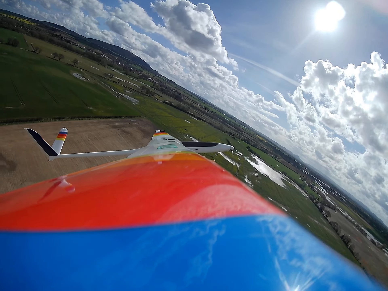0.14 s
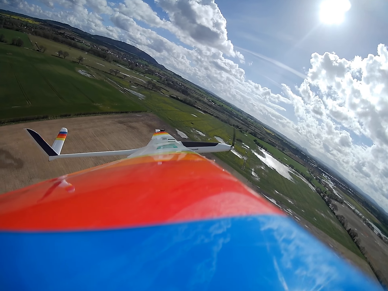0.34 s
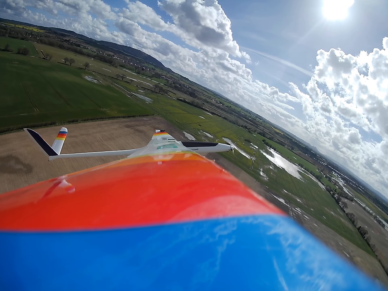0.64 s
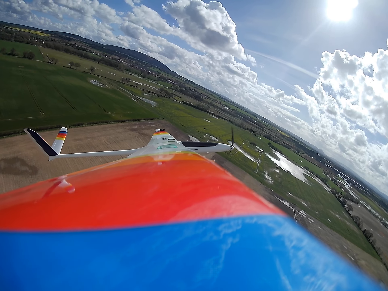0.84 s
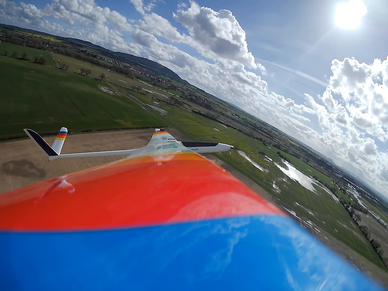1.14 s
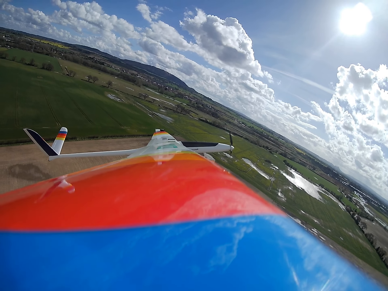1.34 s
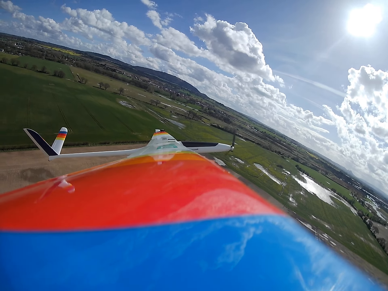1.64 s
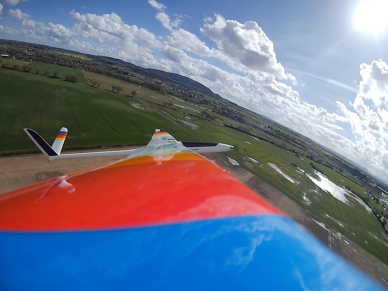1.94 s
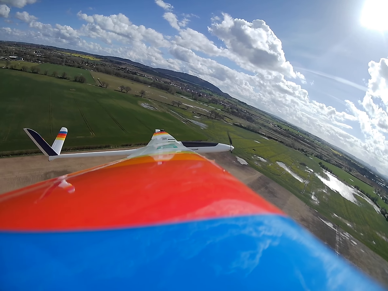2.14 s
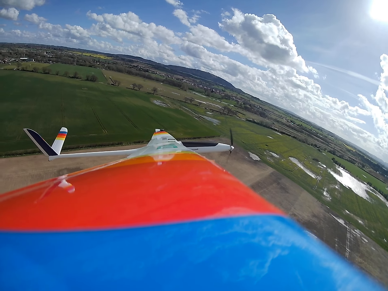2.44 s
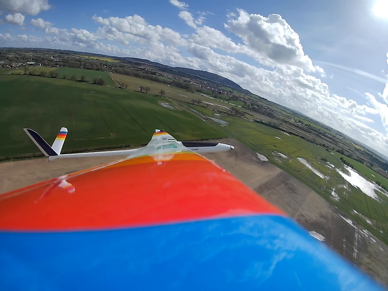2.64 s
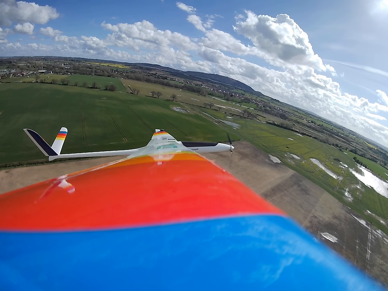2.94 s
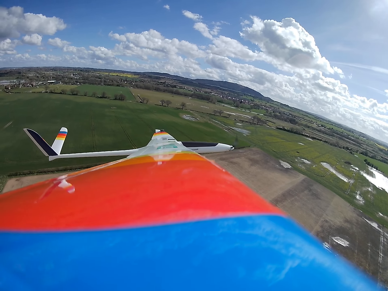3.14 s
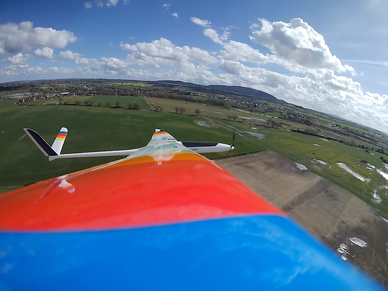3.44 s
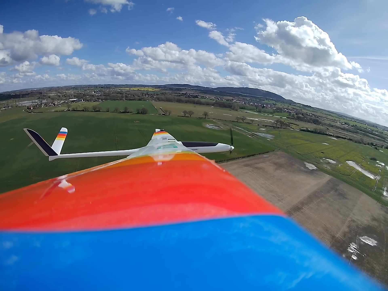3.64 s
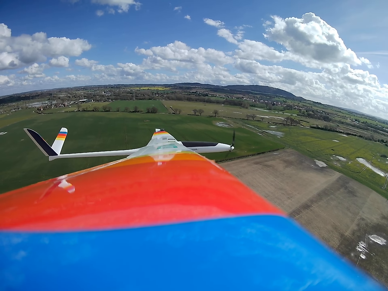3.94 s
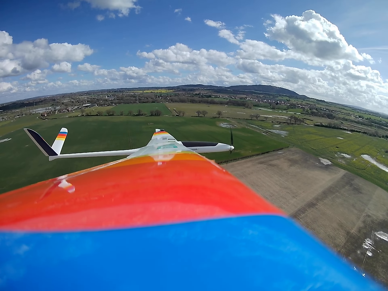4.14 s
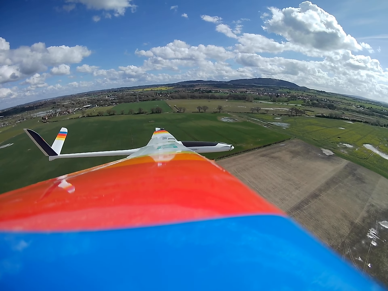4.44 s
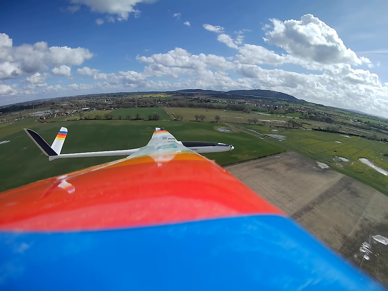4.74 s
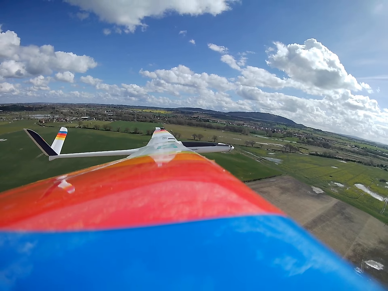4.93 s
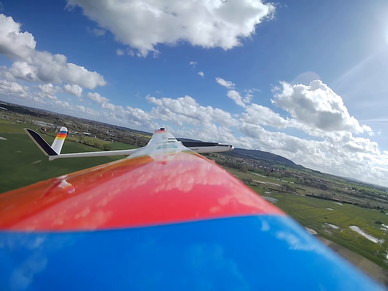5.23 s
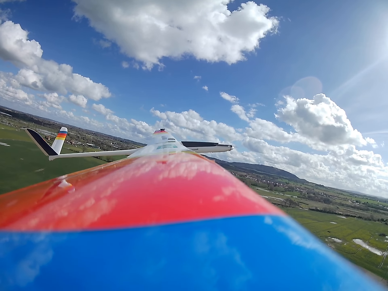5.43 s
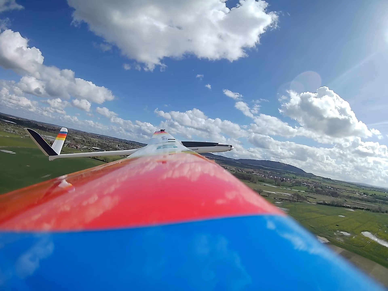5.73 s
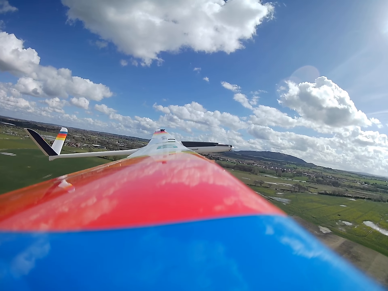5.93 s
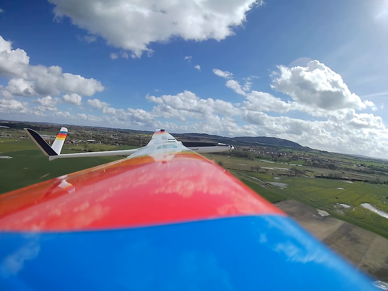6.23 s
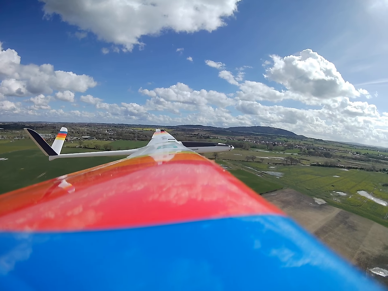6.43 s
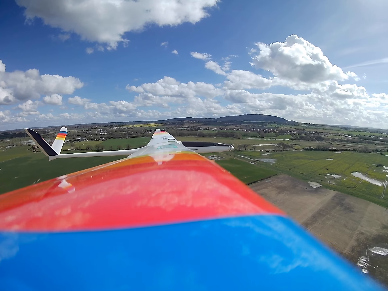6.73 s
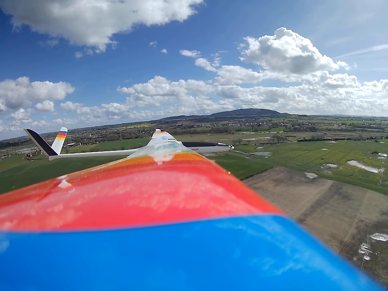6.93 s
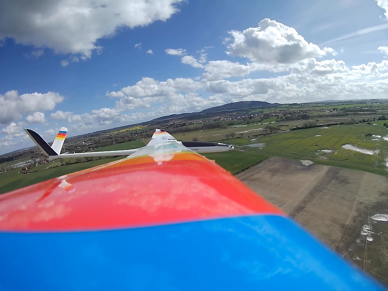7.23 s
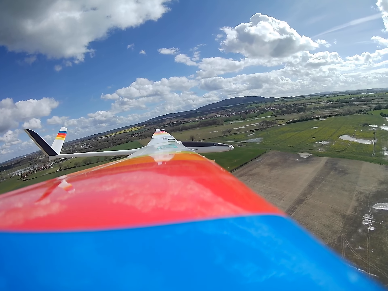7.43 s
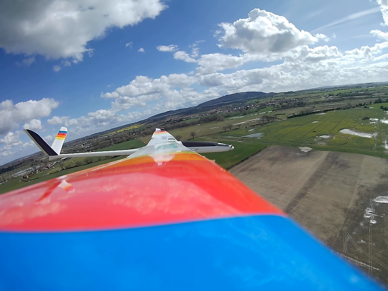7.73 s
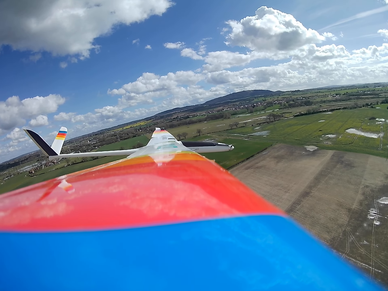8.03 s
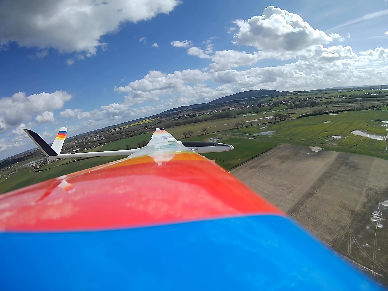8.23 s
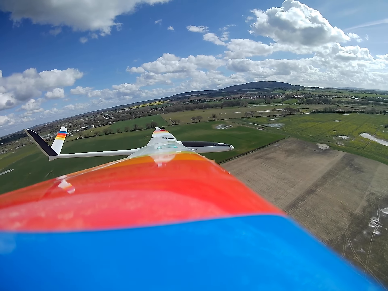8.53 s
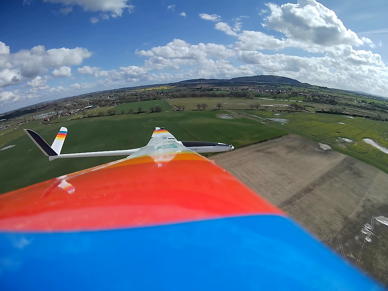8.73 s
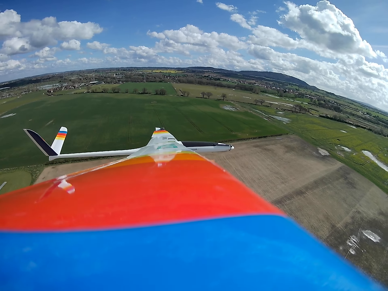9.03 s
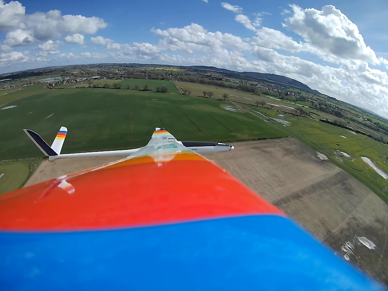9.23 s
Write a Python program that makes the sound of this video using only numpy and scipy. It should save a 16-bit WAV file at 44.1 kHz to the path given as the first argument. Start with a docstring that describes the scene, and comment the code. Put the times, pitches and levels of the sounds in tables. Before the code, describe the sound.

Close rushing air with buffets and small pops, an electric motor winding down underneath, the wind fading dull, then surging loud and bright again.

```python
"""On the wing of an electric model glider, one camera microphone close in the rushing air, heard through the housing.
At first the wind is full and bright, gusts buffet the wing, and motor tones and a controller sizzle lie beneath.
Just before three seconds the motor is eased back, its tones glide down, and the first eddies have begun to pop.
The power is cut at 4.1 s; the wind then grows softer and duller as the glider slows in a climb, until about 6.4 s.
In the dive it swells bright again: shaped noise follows the airspeed, and pops and gusts continue to the end."""
import sys
import numpy as np
from scipy import signal
from scipy.fft import rfft, irfft, next_fast_len
from scipy.io import wavfile

SR = 44100
rng = np.random.default_rng(int(sys.argv[2]) if len(sys.argv) > 2 else 0)


def to_wav(s):
    """Save 16-bit WAV."""
    ch = np.atleast_2d(s).T  # columns
    pcm = np.round(np.clip(ch, -1, 1) * 32767)  # PCM
    wavfile.write(sys.argv[1], SR, pcm.astype(np.int16))


N = 413195
TIME = np.arange(N) / SR  # s
FREQS = np.maximum(np.arange(N // 2 + 1) * SR / N, 1)  # Hz


def undb(db):
    """Decibels to gain."""
    return 10 ** (np.asarray(db) / 20)


def unit(x):
    """Scale to rms 1."""
    return x / np.sqrt(np.mean(x ** 2))


def curve(table):
    """Read (t/s, value) points sample by sample."""
    s, values = np.transpose(table)
    return np.interp(TIME, s, values)


def at_hz(table, hz):
    """Read (f/Hz, value) points on a log-frequency axis."""
    points, values = np.transpose(table)
    return np.interp(np.log(hz), np.log(points), values)


def shaped(x, gain):
    """Filter by a gain given at FREQS."""
    size = next_fast_len(N, True)
    size_freqs = np.arange(size // 2 + 1) * SR / size
    return irfft(rfft(x, size) * np.interp(size_freqs, FREQS, gain), size)[:N]


def resonances(x, modes):
    """Broad steep-sided resonances, each at its own rms level for white noise of rms 1."""
    gain = 0
    for hz, width, db in modes:
        bell = (1 + ((FREQS - hz) / width) ** 2) ** -2.5
        gain = gain + undb(db) * unit(bell)
    return shaped(x, gain)


def walk(rate):
    """Random wander with a spread near 1, heading for `rate` new values a second."""
    steps = rng.standard_normal(N // 20)
    return np.interp(TIME * rate, np.arange(len(steps)), steps) * np.sqrt(3 / 2)


def turbulence(clump_db, clump_rate):
    """Pressure noise that comes in clumps, as small eddies pass."""
    return unit(rng.standard_normal(N) * undb(clump_db * walk(clump_rate)))


# Airflow over the camera through cruise, climb and dive: t/s, rush level/dB before the trim in rush_level
AIRFLOW = [(0.0, -20.5), (.45, -21.5), (.65, -22), (1.62, -21.5), (2.12, -23), (2.8, -21), (3.3, -21.5),
           (3.64, -20), (4.2, -20), (4.42, -20.5), (5.1, -24), (5.3, -25.5), (5.8, -28), (6.05, -30),
           (6.2, -31.2), (6.4, -32.5), (6.74, -32), (6.85, -30.5), (7.1, -31), (7.3, -29), (7.65, -29.5),
           (7.71, -26.8), (8.0, -24.5), (8.25, -22.5), (8.6, -21.5), (9.37, -23)]
# Faster air sheds smaller eddies, so the treble swells most: f/Hz, level gained per dB of airflow/dB
SWELL = [(60, 0.72), (150, 0.62), (500, 0.65), (1000, 1.08), (2200, 1.26), (5000, 2), (12000, 2.5)]
CRUISE_DB = -22  # airflow level at which the spectra hold


def swell(hz):
    """Level in dB that the airspeed adds at one pitch, relative to cruise."""
    return at_hz(SWELL, hz) * (curve(AIRFLOW) - CRUISE_DB)


def rush_level(hz):
    """Level in dB of the rush at one pitch: it follows the airspeed and flutters a little by itself."""
    trim_db, flutter_db, flutter_rate = -0.87, 0.63, 14
    return CRUISE_DB + trim_db + swell(hz) + flutter_db * walk(flutter_rate)


# Colour of the wind at cruise, heard through the housing: f/Hz, relative spectral level/dB
WIND = [(12, -31), (20, 2.5), (65, -2.5), (157, -4), (240, -4), (320, -4), (436, -6), (726, -8),
        (1060, -11.5), (2570, -23.5), (2740, -27), (4000, -37), (5200, -44.5), (8800, -120)]
# Gusts that buffet the wing, and lulls: middle t/s, length/s, extra rumble level/dB, extra roar level/dB
GUSTS = [(.08, .16, 3.5, 0), (.22, .07, 1, 1.8), (.36, .13, 4.5, 1), (0.484, 0.083, 6, 0.5),
         (1.11, 0.083, -4, -2), (2.666, .11, 2, 1), (3.678, 0.12, 2, 1.5), (4.086, .08, 8, -1.2),
         (4.37, .1, 5, 1.5), (4.9, .16, -3.5, -1.7), (5.18, .13, 5, -1), (5.38, 0.15, 2, -2),
         (5.69, 0.13, 3.5, 0.5), (5.85, 0.13, 3.5, .7), (6.99, .05, 1, 0.5), (7.23, .08, 6, -0.5),
         (7.498, 0.05, -2.5, 0.5), (7.71, 0.062, 6.5, 0), (7.88, 0.15, 3.5, -2), (8.02, .07, 6.5, 0.3),
         (8.11, .08, 0, -2.5), (8.18, .07, 6, -0.5), (8.268, 0.12, 3, 1.5), (8.375, 0.055, 1, -0.5),
         (8.47, 0.064, 6, 0), (8.593, 0.14, 5, 0.7), (9.08, .06, 3, 1.5), (9.307, .14, 4, -1)]
ROAR_HZ = 1400  # the extra roar fades out above this
GUST_OCTAVES = 0.7  # reach of the extra rumble above the lowest band


def wind():
    """Turbulence on the housing, in octave bands whose levels follow the airspeed and the gusts."""
    rumble, roar = np.zeros((2, N))
    for middle, length, rumble_db, roar_db in GUSTS:
        gust = np.exp(-(2 * (TIME - middle) / length) ** 2)
        rumble += rumble_db * gust
        roar += roar_db * gust

    pressure = turbulence(clump_db=0.7, clump_rate=400)
    colour = undb(at_hz(WIND, FREQS))
    rush_rms = np.sqrt(np.mean(colour ** 2 * (FREQS > 150) * (FREQS < 1200)))
    buffet_rms = np.sqrt(np.mean(colour ** 2 * (FREQS > 20) * (FREQS < 80)))
    lowest_hz = 62.5
    octave = np.clip(np.log2(FREQS / lowest_hz), 0, 6)

    # the lowest band is the buffeting, which heaves slightly and rises in rough air
    buffet_db, heave_db, heave_rate = -29.5, 0.1, 6
    buffet_level = buffet_db + swell(lowest_hz) + rumble + heave_db * walk(heave_rate)
    buffet = shaped(pressure, colour * np.maximum(1 - octave, 0)) / buffet_rms
    out = buffet * undb(buffet_level)

    # the bands above overlap and roar in the gusts
    for k in range(1, 7):
        hz = lowest_hz * 2 ** k
        band = shaped(pressure, colour * np.maximum(1 - abs(octave - k), 0)) / rush_rms
        gust_rumble = rumble * np.exp(-(k / GUST_OCTAVES) ** 2)
        gust_roar = roar / (1 + (hz / ROAR_HZ) ** 2)
        out += band * undb(rush_level(hz) + gust_rumble + gust_roar)
    return out


# Hiss of the air at the housing seams, lowest and loudest first, then the thin high ones:
# f/Hz, width f/Hz, level relative to the rush/dB
SEAMS = [(5105, 1030, -35.5), (6940, 580, -61.5), (9040, 780, -53.5), (10800, 1500, -50.5),
         (13000, 1000, -55), (15100, 900, -68)]


def seam_hiss():
    """Air at the seams hisses with eddies of its own; all flutter together, the loudest seam half as deep."""
    flutter_db, flutter_rate = 1.2, 30
    flutter = flutter_db * walk(flutter_rate)
    loud_level = rush_level(SEAMS[0][0]) + flutter / 2
    thin_level = rush_level(SEAMS[-1][0]) + flutter
    loud = resonances(rng.standard_normal(N), SEAMS[:1]) * undb(loud_level)
    thin = resonances(rng.standard_normal(N), SEAMS[1:]) * undb(thin_level)
    return loud + thin


# Single eddies striking the microphone:
# t/s, push level/dB, half width of the push/s, suction as a share of the push
POPS = [(1.772, -11.5, .0003, .9), (2.7944, -12, .0004, .7), (2.7973, -3, .00025, .1),
        (2.854, -11.5, .00025, .4), (3.4568, -9, .0002, .1), (3.6027, -7, .0003, .5),
        (5.0215, -13.5, .0004, 1), (5.4555, -15.5, .0005, .9), (5.994, -17, .0002, .8),
        (6.4865, -19, .0011, .6), (6.922, -15.5, .0002, .1), (7.1048, -13, .0008, .7),
        (7.215, -18, .0002, .2), (7.665, -20, .0003, .6), (7.8333, -15, .0011, .7), (8.322, -11, .0004, 1),
        (8.594, -12.5, .0012, 1), (8.861, -12.5, .0004, 1.1), (9.1198, -12, .0003, .4)]
SUCTION_LAG = 2.33  # the suction follows the push by this many half widths
SNAP_S = 0.00026  # pushes wider than this are too soft to make the seam snap much


def pops():
    """An eddy at the microphone pushes, then sucks, in a brief swirl: small ones tick, wide ones thump."""
    snap_db, swirl_db, swirl_s = -7.0, -19.5, .003
    thumps, spikes, swirl = np.zeros((3, N))
    for s, db, half_s, suction in POPS:
        near = slice(int((s - .03) * SR), int((s + .03) * SR))
        age, size = TIME[near] - s, undb(db)
        push = np.exp(-(age / half_s) ** 2)
        pull = suction * np.exp(-(age / half_s - SUCTION_LAG) ** 2)
        thumps[near] += size * (push - pull)
        swirl[near] += size * np.exp(-(age / swirl_s) ** 2)
        spikes[int(s * SR)] += size / (1 + (half_s / SNAP_S) ** 2)
    swirls = shaped(swirl * rng.standard_normal(N), unit(undb(at_hz(WIND, FREQS))))
    # squaring favours the hardest, sharpest ones, which make the loudest seam snap
    seam_hz, seam_width, _ = SEAMS[0]
    snaps = resonances(spikes ** 2, [(seam_hz, seam_width, 0)])
    return thumps + undb(swirl_db) * swirls + undb(snap_db) * snaps


# Motor speed, full throttle, eased back, then run down: t/s, shaft rate f/Hz
SHAFT = [(2.87, 118.65), (3.0, 112), (3.1, 109.2), (3.3, 105.3), (3.5, 102.6), (3.7, 96), (4.0, 77),
         (4.12, 35), (4.2, 20), (4.5, 5)]
PART_THROTTLE_DB = 1  # extra level when the controller chops the current
PART_THROTTLE_HALVINGS = .25  # drop in speed at which that extra is reached
CUT_S, CUT_DB_PER_S = 4.1, 150  # the power is cut and the motor's sound dies away


def motor():
    """One shaft angle drives the tones and sizzle; throttle and power cut set the level of all motor sound."""
    shaft_hz = curve(SHAFT)
    angle = 2 * np.pi * np.cumsum(shaft_hz * (1 + 0.00027 * walk(9.7))) / SR
    halvings = np.log2(shaft_hz.max() / shaft_hz)  # octaves below full speed
    chopping = np.minimum(halvings / PART_THROTTLE_HALVINGS, 1)
    die_away = CUT_DB_PER_S * np.maximum(TIME - CUT_S, 0)
    drive = undb(PART_THROTTLE_DB * chopping - die_away)
    waver = undb(0.65 * walk(6.7))
    tones = (whine(angle, halvings) + bearings(angle, shaft_hz)) * waver
    return drive * (tones + switching(angle, halvings) + wing_boom() + sizzle(angle))


# Propeller and magnetic tones: multiple of the shaft rate, rms level at full speed/dB,
# level lost per halving of speed/dB
WHINE = [(2, -43, 20), (21, -46.5, 130), (42, -70, 130)]


def whine(angle, halvings):
    """Propeller and magnetic tones locked to the shaft, weaker as it slows."""
    tones = sum(undb(db - fade * halvings) * np.sin(k * angle) for k, db, fade in WHINE)
    return np.sqrt(2) * tones  # sine peak from rms


# Bearing tones: multiple of the shaft rate
BEARINGS = [14.56, 15.89]
# How loud the fuselage makes a bearing tone of each pitch: f/Hz, rms level/dB
FUSELAGE = [(900, -76), (1420, -60), (1520, -39), (1600, -41), (1730, -45.5), (1890, -48.5)]


def bearings(angle, shaft_hz):
    """Bearing tones swell as they glide down through the fuselage resonance."""
    tones = sum(undb(at_hz(FUSELAGE, k * shaft_hz)) * np.sin(k * angle) for k in BEARINGS)
    return np.sqrt(2) * tones


# Switching tone and its side tones: multiple of the shaft rate above it, rms level at full speed/dB
SWITCHING = [(0, -80), (10, -80), (11, -73.5), (12, -77), (14, -77), (19, -84), (23, -86), (27, -74.5),
             (31, -87), (33, -80), (37, -78)]
SWITCH_HZ = 7989


def switching(angle, halvings):
    """The controller's steady switching tone with shaft-spaced side tones, 14 dB weaker per halving of speed."""
    carrier = 2 * np.pi * SWITCH_HZ * TIME
    tones = 0
    for k, db in SWITCHING:
        phase = rng.uniform(0, 2 * np.pi)
        tones = tones + undb(db) * np.sin(carrier + k * angle + phase)
    return np.sqrt(2) * tones * undb(-14 * halvings)


# Ringing of the motor can: f/Hz, width f/Hz, level relative to SIZZLE_DB/dB
CAN = [(8950, 800, -26), (12070, 1600, 0.5), (15400, 700, -16.5)]
SIZZLE_DB = -62  # before pulsing and throttle


def sizzle(angle):
    """Controller noise rings the motor can and pulses twice a turn."""
    pulse = 1 + 0.56 * np.cos(2 * angle)
    return undb(SIZZLE_DB) * resonances(rng.standard_normal(N), CAN) * pulse


# Boom of the wing while the propeller shakes it: f/Hz, width f/Hz, rms level/dB
WING = [(251, 99, -33.5)]


def wing_boom():
    """The shaken wing resonates as low noise in uneven surges."""
    heave_db, heave_rate = 2.5, 7.5
    surges = unit(undb(heave_db * walk(heave_rate)))
    return resonances(rng.standard_normal(N), WING) * surges


def scene():
    """Wind, seam hiss, eddy pops and motor at the one microphone."""
    return (wind() + seam_hiss() + pops() + motor())[None]


# Dead spots in the camera's treble: f/Hz, width f/Hz
DEAD_SPOTS = [(4500, 640), (6520, 500), (7420, 600), (8220, 200), (9780, 500)]
TOP_HZ = 15800


def record(dry):
    """The camera has narrow dead spots in its treble, a faint hiss of its own and a steep top cut."""
    for hz, width in DEAD_SPOTS:
        dry = signal.lfilter(*signal.iirnotch(hz, hz / width, fs=SR), dry)
    heard = dry + undb(-91.5) * rng.standard_normal(dry.shape)
    top_cut = signal.ellip(8, .2, 70, TOP_HZ, fs=SR, output="sos")
    return signal.sosfilt(top_cut, heard)


dry = scene()
out = record(dry)
to_wav(out)
```